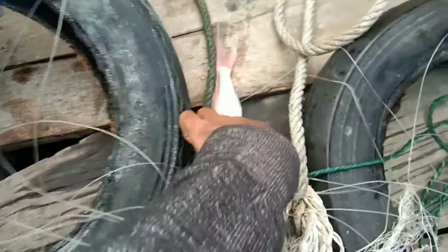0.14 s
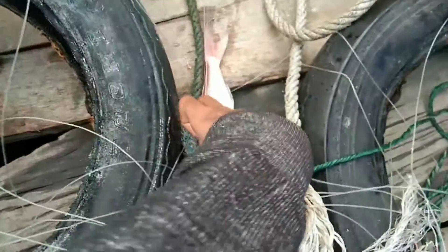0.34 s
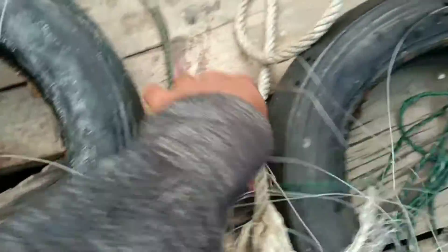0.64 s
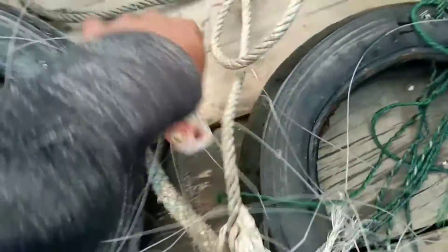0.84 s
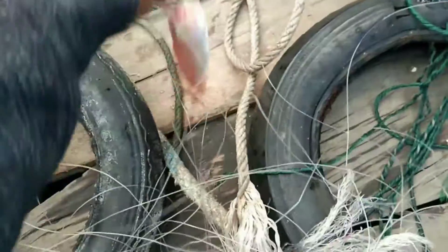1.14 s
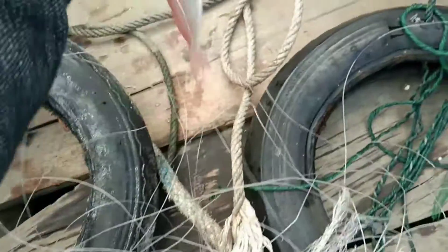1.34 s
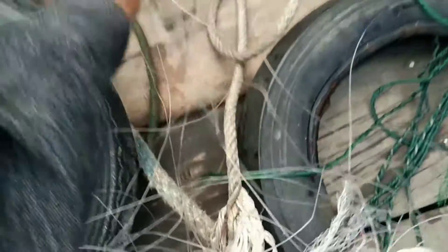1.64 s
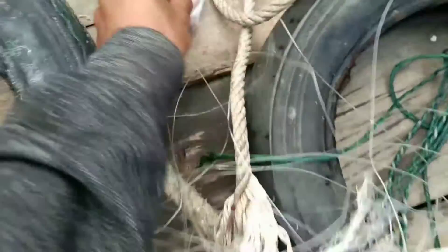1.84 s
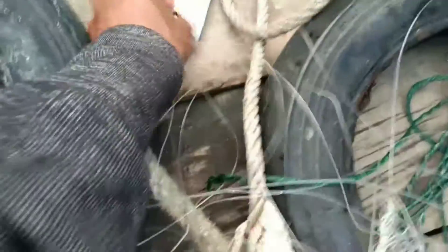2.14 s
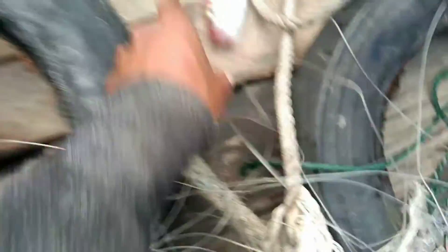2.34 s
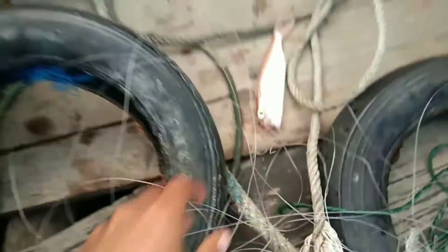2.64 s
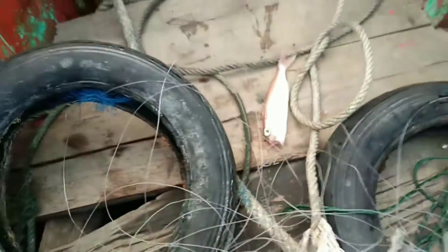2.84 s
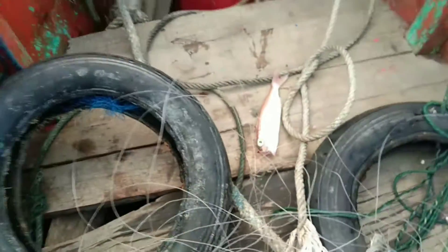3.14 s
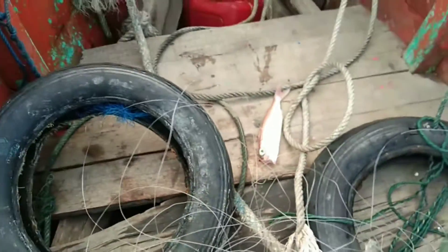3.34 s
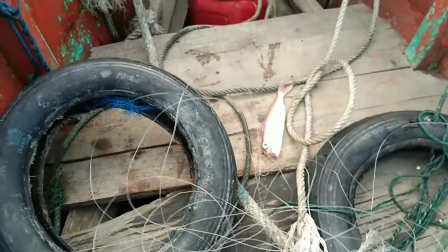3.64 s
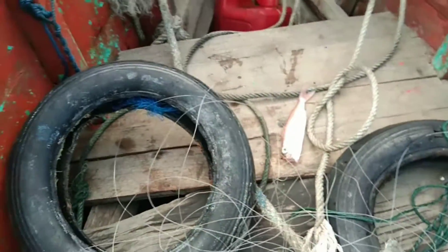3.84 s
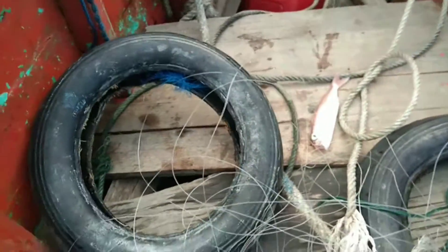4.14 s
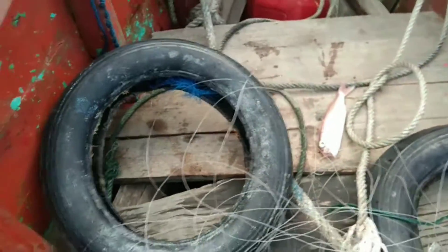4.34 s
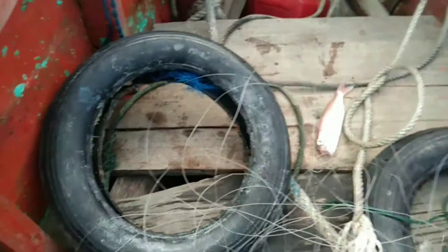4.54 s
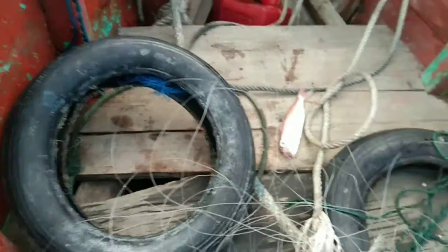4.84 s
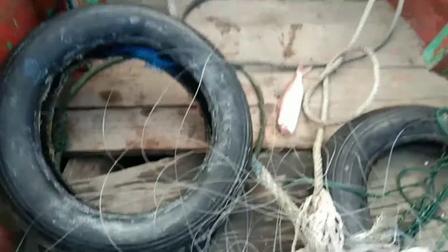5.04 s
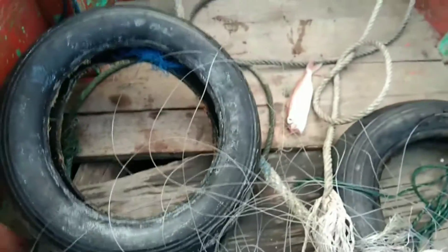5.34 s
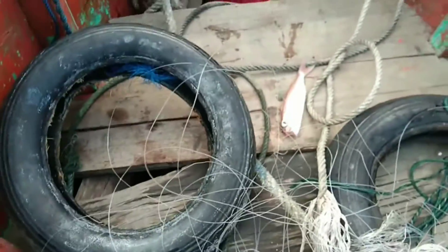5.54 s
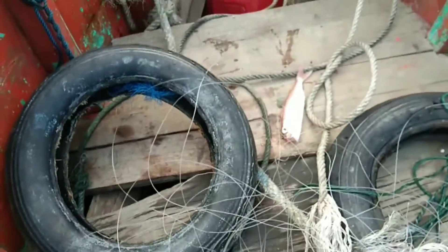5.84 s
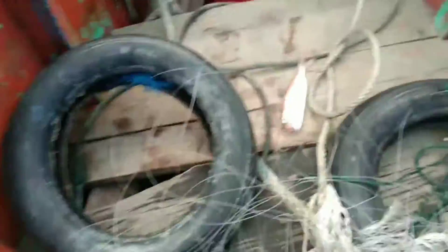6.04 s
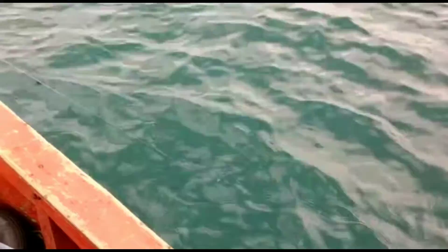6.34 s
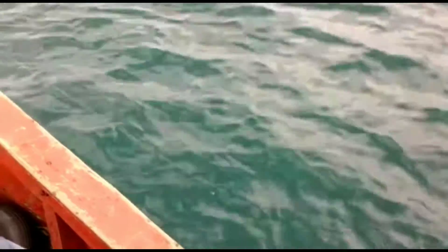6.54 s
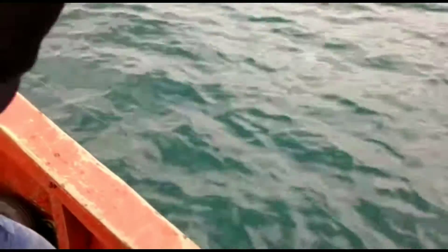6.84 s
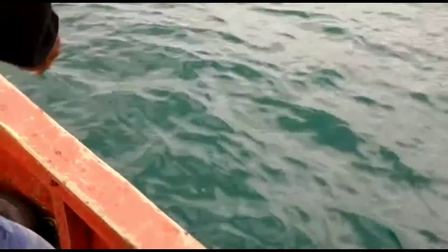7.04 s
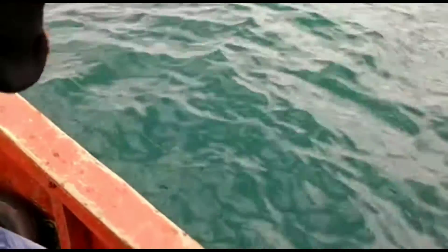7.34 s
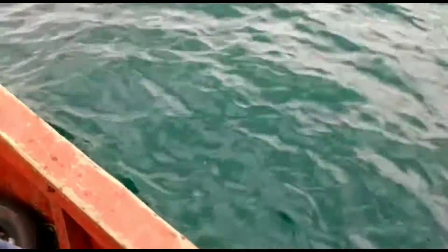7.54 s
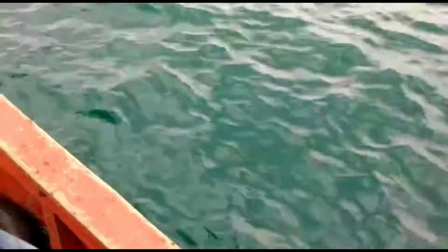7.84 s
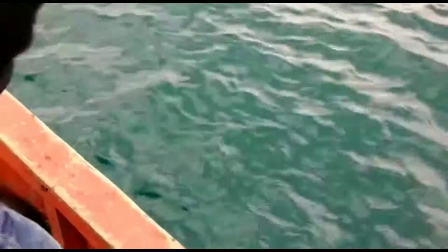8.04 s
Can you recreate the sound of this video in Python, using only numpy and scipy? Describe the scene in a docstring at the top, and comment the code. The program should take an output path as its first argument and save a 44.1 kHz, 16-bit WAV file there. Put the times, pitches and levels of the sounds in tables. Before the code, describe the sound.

From the start a single-cylinder diesel runs loud and close in a small wooden boat, chugging evenly at about fourteen firings a second. Each firing is a sharp, bright knock with mid-range valve clatter, ringing metal covers and a low hull boom; gears rattle between blows and planks drum. Low rumble swells around 0.7 and 2.3 s. From 0.7 to 2.3 s the microphone is low by the deck, the highest treble slightly dulled; by about 3.5 s it is lifted, and the metallic ring sits higher. The knock's brightness varies gently. At 6.16 s the engine breaks off abruptly, leaving a tiny dry click and short silence. From 6.35 s far quieter water laps at the hull: bubbly wash, a low surge near 7.0, glugs, brisk splashes at 7.5 and 7.64, and a drop's tick at 7.9, ending in small watery sounds.

```python
"""A single-cylinder diesel chugs at even speed in a small wooden boat, close to the microphone.
Every firing cracks (shaped noise), rattles and rings the engine's metal (noise bands and resonators)
and sets the hull booming (resonators struck by impulses). The microphone is lifted from the deck
about halfway through. The engine sound breaks off abruptly, with a tiny click and a short silence;
water then laps and splashes: swelling noise, noise bursts and the rising sine pings of bubbles."""
import sys
import numpy as np
from scipy import signal
from scipy.fft import rfft, irfft, next_fast_len
from scipy.io import wavfile
from scipy.ndimage import uniform_filter1d, minimum_filter1d, map_coordinates

SR = 44100
rng = np.random.default_rng(int(sys.argv[2]) if len(sys.argv) > 2 else 0)


def pcm_store(signal):
    """Save signal as 16-bit PCM."""
    levels = np.round(np.clip(np.atleast_2d(signal), -1, 1) * 32767)
    wavfile.write(sys.argv[1], SR, levels.astype(np.int16).T)


N = 362061
FIRST_S, BREAK_OFF_S, CLICK_S, SEA_START_S = .0632, 6.1595, 6.1822, 6.348
TOP_HZ = 15700  # upper band limit


def amp(db):
    """Decibels to gain."""
    return 10 ** (np.asarray(db) / 20)


def unit(x):
    """x scaled to rms 1."""
    return x / np.sqrt(np.mean(x ** 2) + 1e-20)


def clock():
    """The time of every sample in seconds."""
    return np.arange(N) / SR


def curves(rows):
    """One value per sample for each column after the time."""
    s, *cols = np.transpose(rows)
    return [np.interp(clock(), s, c) for c in cols]


def wobble(rate):
    """A smooth random curve, rate knots a second."""
    return map_coordinates(rng.standard_normal(int(N * rate / SR) + 4), [clock() * rate])


def filtered(x, response):
    """x times a complex response of frequency."""
    m = next_fast_len(len(x) + SR)
    return irfft(rfft(x, m) * response(np.fft.rfftfreq(m, 1 / SR)), m)[:len(x)]


def resonances(x, modes):
    """x through a bank of (Hz, width Hz, gain) resonators."""
    return filtered(x, lambda f: sum(g * 1j * f * w / (c * c - f * f + 1j * f * w) for c, w, g in modes))


def noise(spectrum, patchy_db):
    """Noise of rms 1 with a (Hz, dB) colour and short-lived peaks of random pitch."""
    z = signal.stft(rng.standard_normal(N), nperseg=512)[2]
    field = uniform_filter1d(rng.standard_normal(z.shape), size=3, axis=0)  # blurred over pitch
    field = uniform_filter1d(field, size=5, axis=1)  # and over time
    patchy = signal.istft(z * amp(patchy_db * unit(field)), nperseg=512)[1][:N]
    f, db = np.transpose(spectrum)
    return unit(filtered(patchy, lambda hz: amp(np.interp(np.log(hz + 1), np.log(f), db))))


def burst(age, rise, t60):
    """A quick rise and an exponential decay (60 dB in t60 s), silent before age 0."""
    age = np.maximum(age, 0)
    return (1 - np.exp(-age / rise)) * np.exp(-np.log(1000) * age / t60)


def swells(crests, levels_db, swell_s, fall_s, calm_db):
    """An envelope of exponential swells and falls above a calm floor, summed as power."""
    age = clock() - crests[:, None]
    shape = np.exp(np.minimum(age / swell_s[:, None], -age / fall_s))
    waves = amp(levels_db)[:, None] * shape
    return np.sqrt(amp(calm_db) ** 2 + np.sum(waves ** 2, axis=0))


# engine speed: t/s, firings per second
ENGINE_SPEED = [(0.0, 14.046), (0.44, 14.177), (0.88, 14.132), (1.32, 14.164), (1.76, 14.135),
                (2.2, 14.107), (2.64, 14.131), (3.08, 14.059), (3.52, 14.076), (3.96, 14.186),
                (4.4, 14.134), (4.84, 14.157), (5.28, 14.192), (5.72, 14.197), (6.16, 14.292)]


def firings(jitter):
    """Firing times with random jitter (s), starting with the engine already running."""
    cycles = np.cumsum(curves(ENGINE_SPEED)[0]) / SR
    cycles -= np.interp(FIRST_S, clock(), cycles)
    later = np.interp(np.arange(int(cycles[-1])), cycles, clock())
    earlier = FIRST_S - np.arange(8, 0, -1) / ENGINE_SPEED[0][1]
    times = np.r_[earlier, later]
    return times + jitter * rng.standard_normal(len(times))


def pulses(times, scatter_db):
    """One impulse of random size at each time, with a second of run-up."""
    sizes = amp(scatter_db * rng.standard_normal(len(times)))
    return np.bincount(np.round((times + 1) * SR).astype(int), sizes, N + 2 * SR)[:N + SR]


def strokes(times, rise, t60, scatter_db):
    """The envelope of a blow repeated at the given times."""
    shape = burst(np.arange(SR // 4) / SR, rise, t60)
    return signal.fftconvolve(pulses(times, scatter_db), shape)[SR:SR + N]


# microphone height: t/s, height [0 near the deck - 1 lifted]
MIC_HEIGHT = [(0, 0.32), (.7, 0.019), (2.3, 0.035), (2.9, 0.38), (3.5, 0.86), (6.2, 1)]


def lifted(near_deck, higher_up):
    """What the microphone hears as its height changes: a blend of two signals or settings."""
    height = np.clip(curves(MIC_HEIGHT)[0], 0, 1)
    return (1 - height) * near_deck + height * higher_up


# colour of the knock's crack: f/Hz, relative level/dB per Hz
CRACK_COLOUR = [(900, -20.5), (2000, -7.5), (2700, -3), (4000, 3.5), (4800, 0), (5700, 3.5), (6600, -1.5),
                (8000, -11.5), (9000, -17), (10300, -17), (12000, -46), (15500, -36)]
# the knock's treble, before a fixed 1.5 dB lift: t/s, level/dB
CRACK_LEVELS = [(0, -26.5), (.75, -27), (1.25, -30.5), (1.85, -24), (2.35, -23), (2.75, -29.5), (3.25, -26),
                (3.9, -30.5), (4.9, -27.5), (5.3, -24), (6.1, -31.5)]


def crack(times, crack_db):
    """Combustion knock: a bright noise burst at every firing."""
    knock = strokes(times - .0006, rise=.0007, t60=0.07, scatter_db=0.5)
    return amp(crack_db + 1.5) * unit(knock) * noise(CRACK_COLOUR, patchy_db=4)


# colour of the clatter: f/Hz, relative level/dB per Hz
CLATTER_COLOUR = [(300, -11.5), (600, 1.5), (720, -3), (900, -4.5), (1100, -8.5), (1400, -3), (1650, -2.5),
                  (2230, 5.5), (2700, -2), (3600, -3), (4800, -8), (6300, -9.5), (8000, -38), (12000, -45)]


def clatter(block, clatter_db):
    """Valve clatter: mid-range noise shaken by every blow to the engine block."""
    return amp(clatter_db - 1.26) * unit(block) * noise(CLATTER_COLOUR, patchy_db=2.5)


def clang(times, width_hz):
    """The strongest metallic ring: a noise band, given a new pitch and strength at every knock."""
    deck_hz, high_hz, scatter_hz = 3323, 3707, 291.2
    deck_db, high_db, scatter_db = -31, -26, 2
    knock = np.maximum(np.searchsorted(times, clock()) - 1, 0)
    detune, strength = np.clip(rng.standard_normal((len(times), 2)), -2, 2)[knock].T
    # two slow noises on a cosine and a sine make a band around the pitch
    a, b = (unit(filtered(rng.standard_normal(N), lambda f: 1 / (1 + (f / width_hz) ** 2)))
            for _ in range(2))
    phase = 2 * np.pi * np.cumsum(lifted(deck_hz, high_hz) + scatter_hz * detune) / SR
    db = lifted(deck_db, high_db) + scatter_db * strength
    return amp(db) * (a * np.cos(phase) + b * np.sin(phase))


# ringing of the engine's covers: f/Hz, width [Hz], relative level/dB
COVER_MODES = [(1380, 40, -1.5), (1883, 69, -4), (2238, 42, 0.5), (2540, 260, -2), (2784, 84, -4.5),
               (4130, 50, -2.5), (5630, 63, -9.5), (6290, 61, -7)]


def covers(sharp, clatter_db):
    """Every knock shakes the covers at new strengths, and they ring on after it."""
    modes = [(hz, width, amp(db)) for hz, width, db in COVER_MODES]
    ringing = resonances(sharp * rng.standard_normal(N), modes)
    return amp(clatter_db - 5.5) * unit(ringing)


# colour of gears and valves: f/Hz, relative level/dB per Hz
GEAR_COLOUR = [(300, -5), (600, 0), (900, 3), (1200, 1), (1700, 0), (2300, 1.5), (3500, -3.5),
               (4800, -10.5), (6300, -9.5), (8000, -28), (12000, -46)]


def gear_rattle(times):
    """Gears and valves keep rattling between the firings, in small uneven ticks."""
    valves = strokes(times + .055, rise=0.0022, t60=0.08, scatter_db=2.0)
    rattle = amp(0.74 * wobble(400)) * np.sqrt(1 + (1.4 * valves) ** 2)
    return amp(-31) * unit(rattle) * noise(GEAR_COLOUR, patchy_db=2.0)


# hull and exhaust resonances: f/Hz, width [Hz], relative level/dB near the deck,
# relative level/dB higher up, polarity [only the sign counts]
HULL_MODES = [(64.6, 2.55, 41, 40, -1.1), (84.7, 3.7, 36.5, 35.5, -1.0), (129.3, 1.8, 38.5, 43, 0.96),
              (151.3, 4.02, 44, 46.5, -1.0), (189.4, 3.56, 46.5, 46.5, -1.0),
              (201.46, 3.76, 43, 41.5, -1.0), (202, 61.3, 32, 33.5, 0.88), (254.8, 9.2, 39, 31.5, 1.0),
              (280.1, 11, 32, -4, -1.0), (354, 5.4, 14.5, 31, 1.0), (395.3, 1.3, 32.5, 29.5, 0.8),
              (433.8, 2, 35, 20, 0.97), (483, 4.4, 28.5, 19.5, 1.0), (533, 11, 30.5, 18, 1.0),
              (591.6, 5.9, 26.5, 23, -1), (635, 6.5, 20.5, 27, 1), (654.7, 6, 34.5, 20, -1),
              (678, 9.5, 20, 20.5, 1), (789.3, 13, 14, 22, -1), (894, 7.7, 13, 21, 1)]


def boom(times):
    """The firing and the exhaust puff a third of a cycle later ring the hull; each blend end has rms 1."""
    firing, exhaust = times - .00136, times + .02127
    push = pulses(firing, scatter_db=0.0) - 0.38 * pulses(exhaust, scatter_db=1.0)
    hz, width, deck_db, high_db, polarity = np.transpose(HULL_MODES)

    def ring(db):
        """The hull's modes at one microphone height, without the run-up."""
        return unit(resonances(push, list(zip(hz, width, np.sign(polarity) * amp(db))))[SR:])

    return lifted(ring(deck_db), ring(high_db))


# colour of the drumming planks: f/Hz, relative level/dB per Hz
PLANK_COLOUR = [(70, -32.5), (110, -8.5), (160, -1), (250, -7), (330, -6.5), (430, -6), (570, -7),
                (650, -5.5), (730, -22), (1200, -24), (4000, -63)]


def planks(block):
    """Planks drum: low noise that swells with every blow over a steady floor."""
    return amp(lifted(-9.5, -11.0)) * unit(0.42 + block) * noise(PLANK_COLOUR, patchy_db=0.5)


# colour of the low rumble: f/Hz, relative level/dB per Hz
RUMBLE_COLOUR = [(20, -34.5), (38, -30.5), (54, -11), (70, -2.5), (105, 1), (160, -9), (300, -31),
                 (800, -62.5)]
# swells of the rumble: crest t/s, level/dB, time to swell [s]
RUMBLE_SWELLS = [(.65, -26.5, .5), (2.33, -25, 0.17), (4.38, -30, .12), (5.801, -32.5, .2)]


def rumble():
    """Low noise swelling under the engine."""
    level = swells(*np.transpose(RUMBLE_SWELLS), fall_s=.28, calm_db=-43)
    return level * noise(RUMBLE_COLOUR, patchy_db=1.5)


def engine():
    """Knock, clatter, ringing metal and hull boom follow the firings, over a free rumble."""
    times = firings(jitter=.0001)
    crack_db, = curves(CRACK_LEVELS)
    # a brighter knock has less middle: clatter and ring lose .2 dB per dB of treble
    middle_db = -.2 * (crack_db - np.median(crack_db))
    clatter_db = lifted(-24.5, -28.5) + middle_db
    sharp = strokes(times - .0004, rise=.0005, t60=0.043, scatter_db=2.5)
    block = strokes(times - .001, rise=0.0025, t60=0.09, scatter_db=0.07)
    metal = crack(times, crack_db) + clatter(block, clatter_db)
    metal += amp(middle_db) * unit(sharp) * clang(times - .0004, width_hz=480)
    metal += covers(sharp, clatter_db) + gear_rattle(times)
    # down among the tyres the highest treble is shaded
    shade_hz = 9000
    shaded = filtered(metal, lambda f: 1 / np.sqrt(1 + (f / shade_hz) ** 4))
    metal = lifted(shaded, metal)
    hull = amp(-20) * (amp(1.05) * boom(times) + planks(block))
    return metal + rumble() + hull


def click():
    """One tiny, dry tick: a sinc pulse that dies away on both sides."""
    age = clock() - CLICK_S
    return -.24 * np.sinc(age * TOP_HZ) * np.exp(-np.abs(age) / 0.00078)


def bubbles(count, middle_hz, cycles, scatter_db):
    """Small bubbles of random pitch and size, each a short rising ping; rms 1 over the sea."""
    when, pitch, size = rng.random(count), *rng.standard_normal((2, count))
    hz = np.clip(middle_hz * np.exp(.5 * pitch), 300, 3000)[:, None]
    age = np.arange(SR // 16) / SR
    life = cycles / hz  # t60 in seconds
    tone = np.sin(2 * np.pi * hz * age * (1 + 0.095 * age / life))
    sizes = amp(scatter_db * np.clip(size, -2, 2))[:, None]
    pings = sizes * burst(age, 0.00077, life) * tone
    start = SR * SEA_START_S
    at = (start + when * (N - start)).astype(int)[:, None] + np.arange(len(age))
    sound = np.bincount(at.ravel(), pings.ravel(), N)[:N]
    return sound / np.std(sound[int(start):])


# colours of the low surge and the wash: f/Hz, relative level/dB per Hz
SURGE_COLOUR = [(30, -44.5), (55, -28), (85, -3), (115, 5), (190, 1.5), (300, -6), (500, -14), (1200, -50),
                (5000, -68)]
WASH_COLOUR = [(150, -12), (400, 5), (750, 6.5), (1300, 0), (2300, -4.5), (3200, -16), (5000, -24.5),
               (7000, -33), (8500, -21), (11000, -37), (15500, -26)]
# waves meeting the hull: crest t/s, relative surge level/dB, relative wash level/dB, time to swell [s]
HULL_WAVES = [(6.48, -52, -46.5, .012), (6.72, -61, -50.5, 0.11), (7.014, -40, -51, 0.11),
              (7.295, -49, -45.5, 0.02), (7.525, -49, -46, 0.015), (7.635, -48.5, -70, .018),
              (7.74, -47.5, -52, .022), (7.87, -52, -69, .04)]


def waves():
    """Waves meet the hull: a low surge ends quickly, a bubbly wash drains more slowly."""
    crests, surge_db, wash_db, swell_s = np.transpose(HULL_WAVES)
    surge = swells(crests, surge_db, swell_s, fall_s=0.047, calm_db=-57)
    wash = swells(crests, wash_db, swell_s, fall_s=.1, calm_db=-60) * amp(1.2 * wobble(35))
    foam = amp(-2) * noise(WASH_COLOUR, patchy_db=5.5)
    foam += amp(-5) * bubbles(count=260, middle_hz=954, cycles=52, scatter_db=4.0)
    return amp(2.5) * surge * noise(SURGE_COLOUR, patchy_db=1.5) + wash * foam


# air pockets trapped by the waves: t/s, level/dB, f/Hz at the start, t60 [s]
AIR_POCKETS = [(6.463, -31.5, 532, 0.06), (6.465, -40, 398, 0.16), (6.466, -35, 275, 0.14),
               (6.66, -43, 680, .15), (6.865, -41, 500, 0.11), (6.885, -36, 198, 0.21),
               (6.972, -48, 114, 0.23), (6.995, -38, 210, .13), (7.29, -38, 540, 0.06),
               (7.375, -38, 676, 0.067), (7.52, -25.5, 1080, 0.045), (7.73, -32, 1740, 0.04),
               (7.761, -37, 1010, .05), (7.911, -32, 547, 0.052)]


def glugs():
    """Trapped air rings as a sine; a bubble's pitch climbs a little as it nears the surface."""
    sound = np.zeros(N)
    for s, db, hz, t60 in AIR_POCKETS:
        age = clock() - s
        tone = np.sin(2 * np.pi * hz * age * (1 + 0.027 * age / t60))
        sound += amp(db) * burst(age, rise=0.0017, t60=t60) * tone
    return sound


# colour of the spray: f/Hz, relative level/dB per Hz
SPRAY_COLOUR = [(300, -27), (800, -15), (1100, 2), (2300, 1), (3500, -6), (6000, -16.5), (8500, -7),
                (11000, -25), (15500, -16.5)]
# splashes: t/s, level/dB, rise [s], t60 [s]
SPLASH_EVENTS = [(6.925, -57, .01, 0.18), (7.285, -58, .01, 0.16), (7.318, -56, .005, 0.12),
                 (7.501, -36.5, 0.0028, .1), (7.518, -30, 0.0033, .09), (7.54, -52, .005, 0.16),
                 (7.571, -47, .003, 0.055), (7.637, -25.5, 0.0038, 0.063), (7.655, -55, .005, 0.23),
                 (7.722, -44, 0.01, 0.13), (7.91, -40.5, 0.00041, 0.017), (8.125, -54.5, .003, 0.084)]


def splashes():
    """Small splashes: bursts of patchy spray noise."""
    level = sum(amp(db) * burst(clock() - s, rise, t60) for s, db, rise, t60 in SPLASH_EVENTS)
    return level * noise(SPRAY_COLOUR, patchy_db=7.0)


# colour of a drop's tick: f/Hz, relative level/dB per Hz
TICK_COLOUR = [(2000, -25), (5000, -8), (8500, 8), (11000, -15), (15000, -4)]
# drops ticking on the boat: t/s, level/dB
DROP_EVENTS = [(6.973, -57), (7.029, -45), (7.411, -59), (7.43, -59), (7.868, -59), (7.911, -36.5)]


def drops():
    """Drops tick on the boat: very short, bright noise bursts."""
    level = sum(amp(db) * burst(clock() - s, rise=.0006, t60=0.017) for s, db in DROP_EVENTS)
    return level * noise(TICK_COLOUR, patchy_db=4)


def sea():
    """Waves surge along the hull, glug in trapped air and throw small splashes, over faint hiss."""
    hiss = amp(-75.5) * rng.standard_normal(N)
    return waves() + glugs() + splashes() + drops() + hiss


def scene():
    """The engine sound, broken off abruptly, a click in a short silence, then the sea."""
    t = clock()
    return (engine() * (t < BREAK_OFF_S) + click() + sea() * (t > SEA_START_S))[None]


def record(dry):
    """A fast limiter holds the knocks under full scale; a steep filter cuts above the band limit."""
    ceiling = .78
    needed = np.minimum(1, ceiling / (np.abs(dry[0]) + 1e-9))
    gain = uniform_filter1d(minimum_filter1d(needed, size=89), size=45)  # about 2 ms and 1 ms
    return filtered(dry[0] * gain, lambda hz: 1 / np.sqrt(1 + (hz / TOP_HZ) ** 120))[None]


dry = scene()
out = record(dry)
pcm_store(out)
```